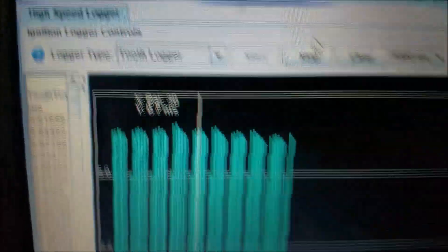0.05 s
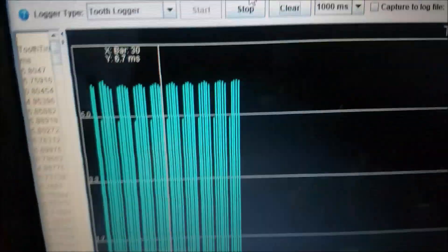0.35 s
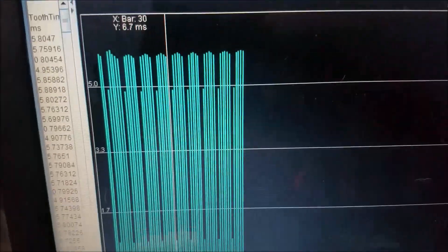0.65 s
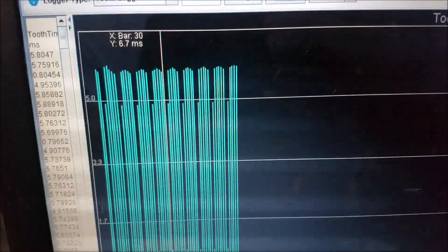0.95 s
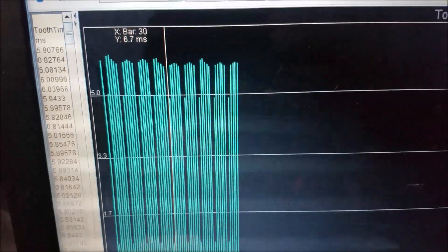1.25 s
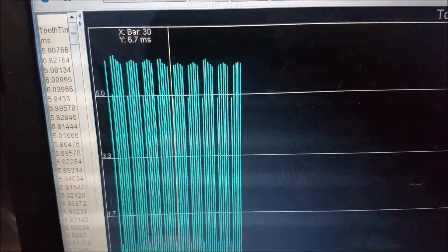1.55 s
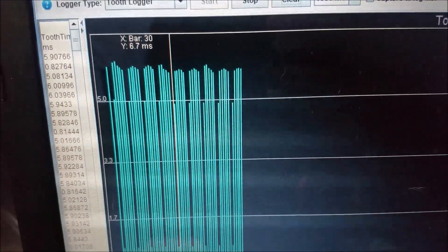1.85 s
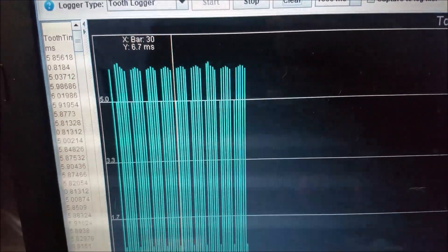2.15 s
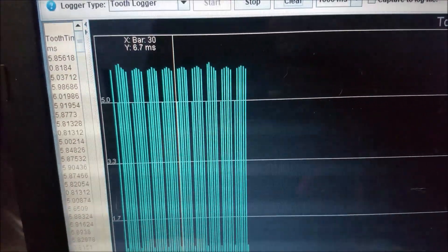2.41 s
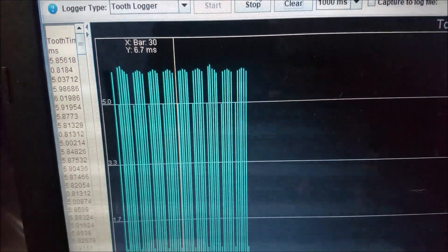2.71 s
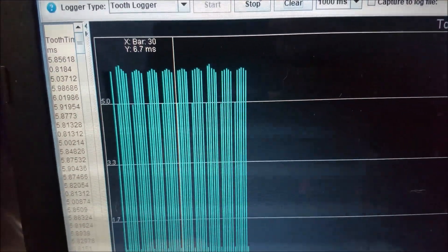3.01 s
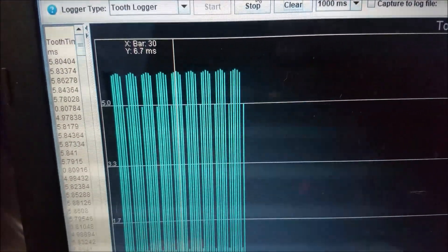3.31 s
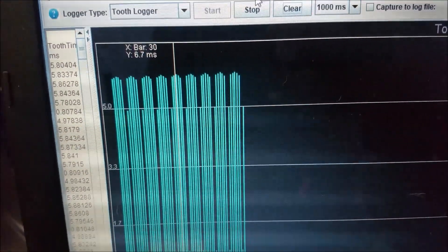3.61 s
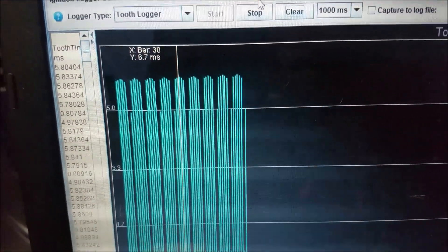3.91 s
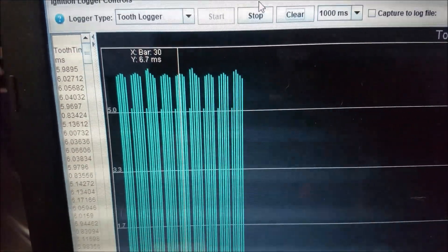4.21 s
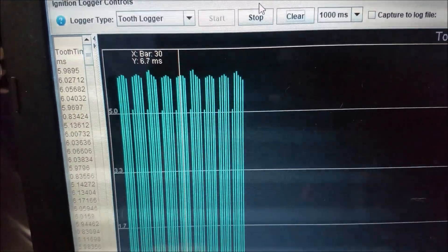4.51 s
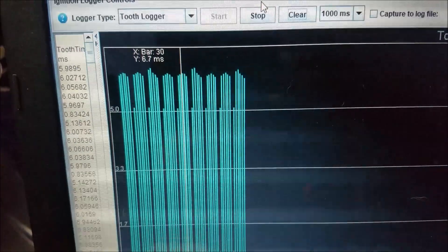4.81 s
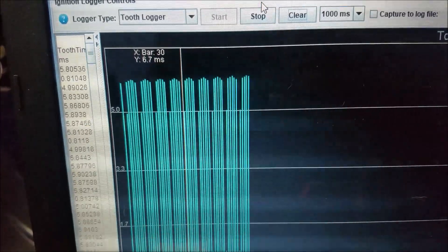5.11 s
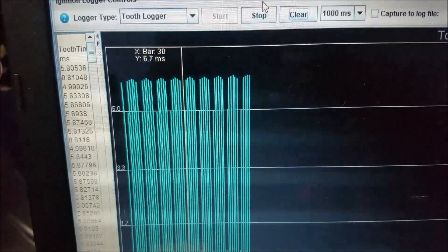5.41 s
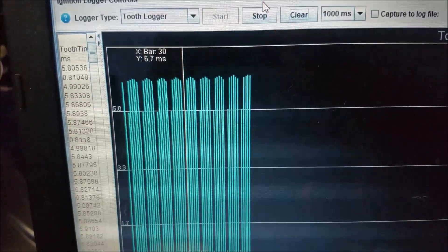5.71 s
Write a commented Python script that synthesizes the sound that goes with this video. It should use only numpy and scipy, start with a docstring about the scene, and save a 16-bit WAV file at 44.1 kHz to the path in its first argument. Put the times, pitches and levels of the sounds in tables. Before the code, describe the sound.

From the first moment a car engine is running at a fast idle, close by in a garage. It misfires, so the deep, booming exhaust has an uneven, chugging beat. Under it are a droning hum, lightly ringing body panels and a low room rumble. A quieter, throbbing hiss with rough ticking and metallic ringing comes mostly from the right. From about 0.1 seconds a faltering cylinder catches now and then with a dull thump, most often between 0.6 and 2.2 seconds and again from 2.9 to 3.8, with a last one near 5.2. Heavier, booming thumps land at about 0.5, 1.2, 3.0, 3.7 and 4.7 seconds. Each thump lifts the engine speed slightly before it sinks back, but the engine never revs. The sound cuts off abruptly at about 5.6 seconds.

```python
"""A V6 engine is already at a fast idle in a garage, two neighbouring cylinders misfiring. Six unequal
pulses a cycle boom through the exhaust and shake the body, over a droning block and a low room rumble.
Metal rings, and intake and belt hiss, roughened by the valve gear, comes mostly from the right.
Almost at once one bad cylinder starts to catch now and then; from half a second its neighbour joins, rarer
and heavier. Each catch thumps and kicks the speed up. Just before the end the sound cuts off."""
import sys
import numpy as np
from scipy import signal
from scipy.fft import rfft, irfft, next_fast_len
from scipy.io import wavfile
from scipy.ndimage import uniform_filter1d, minimum_filter1d

SR = 44100
rng = np.random.default_rng(int(sys.argv[2]) if len(sys.argv) > 2 else 0)


def wrap_up_sound(samples):
    """Save the sound to the file named by the first command line argument, as 16-bit audio."""
    columns = np.atleast_2d(samples).T
    # keep every value between -1 and 1, then stretch to whole-number steps
    tamed = np.clip(columns, -1, 1)
    steps = np.round(tamed * 32767).astype(np.int16)
    wavfile.write(sys.argv[1], SR, steps)


N = 253575
LEAD = SR // 2   # pre-roll, so the engine is already running
TIME = np.arange(-LEAD, N) / SR

# the first misfiring cylinder catches: start_s
HARD_CATCHES = [.088, .584, .869, 1.083, 1.297, 1.439, 1.651, 1.792, 2.219, 2.938, 3.156, 3.373, 3.445,
                3.803, 5.247]
# its neighbour catches: start_s, strength
HEAVY_CATCHES = [(.526, 0.7), (1.167, 0.63), (3.024, 0.57), (3.744, 0.67), (4.681, 0.68)]


def from_db(db):
    return 10 ** (np.asarray(db) / 20)


def unit_rms(x):
    return x / np.sqrt(np.mean(x ** 2) + 1e-20)


def pan(left_db):
    """Left and right gains, left_db apart; negative leans right."""
    return from_db(np.array([[left_db], [-left_db]]) / 2)


def colour(x, spectrum):
    """EQ by a curve through points of frequency_hz, gain_db."""
    size = next_fast_len(len(TIME))
    hz, db = np.transpose(spectrum)
    bins_hz = np.maximum(np.arange(size // 2 + 1) * SR / size, 1)
    gain = from_db(np.interp(np.log(bins_hz), np.log(hz), db))
    return irfft(rfft(x, size) * gain, size)[:len(TIME)]


def resonate(x, hz, width_hz):
    """One resonance with unity gain at its peak."""
    r = np.exp(-np.pi * width_hz / SR)
    feedback = [1, -2 * r * np.cos(2 * np.pi * hz / SR), r * r]
    return signal.lfilter(np.array([1, 0, -1]) * (1 - r * r) / 2, feedback, x + 1e-18)


def resonator_bank(x, modes):
    """Parallel resonances of alternating polarity, each with its own pan."""
    return sum((-1) ** k * from_db(db) * pan(left_db) * resonate(x, hz, width_hz)
               for k, (hz, width_hz, db, left_db) in enumerate(modes))


def swell(x, hz, width_hz):
    """Two resonances in series turn a softened click into a tone that swells and dies."""
    soft = signal.sosfilt(signal.butter(2, 420, fs=SR, output="sos"), x)
    tone = resonate(resonate(soft, hz, width_hz), hz, width_hz)
    return tone * np.e * SR / (2 * np.pi * width_hz)   # a unit click peaks near 1


def clicks(times, sizes):
    """Single-sample pulses at the given times."""
    at = np.round(np.asarray(times) * SR).astype(int) + LEAD
    inside = (at > 0) & (at < len(TIME) - 1)
    return np.bincount(at[inside], np.asarray(sizes)[inside], len(TIME))


def crank_rpm(rise_s=.03, ebb_s=1):
    """Each catch speeds the crank up at once, then it sinks back towards the idle."""
    # speed that the healthy cylinders hold by themselves: time_s, speed_rpm
    idle = [(0.0, 1710.22), (0.5, 1667.19), (1.35, 1629.65), (2.5, 1628.02), (3.1, 1602.2), (4.15, 1617.87),
            (4.65, 1604.5), (4.9, 1624.79), (5.6, 1619.95)]
    starts = HARD_CATCHES + [start for start, _ in HEAVY_CATCHES]
    ages = [np.maximum(TIME - start, 0) for start in starts]
    kicks = sum(np.exp(-age / ebb_s) - np.exp(-age / rise_s) for age in ages)
    return np.interp(TIME, *np.transpose(idle)) + 14.578 * kicks


def firings(cycle, spread_db, jitter_s):
    """One pulse per cylinder per cycle, never quite alike."""
    # the six unequal pulses: place_cycles, level_db
    cylinders = [(.036, -2.6), (.231, -.2), (.381, 1.2), (.559, 0), (.697, .9), (.895, .7)]
    place, db = np.transpose(cylinders)
    whole_cycles = np.arange(np.floor(cycle[0]), cycle[-1])[:, None]
    times = np.interp(whole_cycles + place, cycle, TIME, left=-2, right=2 * TIME[-1])
    late, loud = rng.standard_normal((2,) + times.shape)
    return clicks(times + jitter_s * late, from_db(db + spread_db * loud))


def exhaust(cycle):
    """The silencer passes only the lows of the pulses and cancels one narrow band."""
    # exhaust and garage resonances: pitch_hz, width_hz, gain_db, left_db
    modes = [(42.7, 15.3, -7.6, -2), (75.1, 15, -14.3, 0), (112, 22.5, -18.7, 0), (183.2, 22.2, -4.3, -3),
             (190, 18, -1.3, -3)]
    pulses = from_db(54.6) * firings(cycle, spread_db=.3, jitter_s=.00006)
    muffled = signal.sosfilt(signal.butter(6, 190, fs=SR, output="sos"), pulses)
    notched = muffled - resonate(muffled, hz=225, width_hz=9.2)
    return resonator_bank(notched, modes)


def block_drone(cycle, waver_db=3.0):
    """The block hums in clean tones, each wavering slowly in level, all chugging once a cycle."""
    # engine orders: multiple_of_cycle_rate, level_db
    orders = [(17, -46), (18, -44), (19, -49), (23, -51), (24, -48), (31, -53), (34, -50), (36, -52)]
    waver_times = np.arange(TIME[0], TIME[-1], 1 / 6)
    hum = 0
    for multiple, db in orders:
        waver = np.interp(TIME, waver_times, rng.standard_normal(len(waver_times)))
        tone = np.sqrt(2) * np.sin(2 * np.pi * (multiple * cycle + rng.random()))
        hum = hum + from_db(db + waver_db * waver) * tone
    chug = from_db(8.5 * np.cos(2 * np.pi * (cycle - .55)))
    return hum * chug * pan(-2.9)


def body_panels(cycle):
    """The firings knock on the body, loosely timed, and its panels ring."""
    # panel resonances: pitch_hz, width_hz, gain_db, left_db
    modes = [(260, 11, -57, -14), (330.6, 9.5, -40, -5), (415, 120, -47, 0), (523, 97, -44.5, -7)]
    pulses = from_db(52) * firings(cycle, spread_db=2.5, jitter_s=.0007)
    knocks = signal.sosfilt(signal.butter(2, [220, 620], "band", fs=SR, output="sos"), pulses)
    return resonator_bank(knocks, modes)


def valve_ticks(cycle, valves=12, spread_db=2.5, jitter_s=.0012, decay_s=.0025):
    """Valves close in turn round the cycle: an envelope of short, loosely timed spikes."""
    closings = np.arange(np.ceil(cycle[0] * valves), cycle[-1] * valves) / valves
    times = np.interp(closings, cycle, TIME)
    late, loud = rng.standard_normal((len(times), 2)).T
    hits = clicks(times + jitter_s * late, from_db(spread_db * loud))
    return unit_rms(signal.lfilter([1], [1, -np.exp(-1 / (decay_s * SR))], hits))


def engine_bay(cycle):
    """Hiss and ringing metal throb with the cycle and the crank, roughened by the valve gear."""
    # rush of intake, belts and fan on each side: frequency_hz, relative_db
    rush_left = [(400, -66), (700, -70), (950, -71), (1500, -73), (3000, -75.5), (4000, -79), (5200, -83.5),
                 (8000, -87.5), (9400, -87), (12000, -82), (14300, -81), (15700, -86)]
    rush_right = [(400, -74.5), (700, -72), (950, -68.5), (1500, -71), (2200, -66), (3000, -67),
                  (3800, -74), (6500, -73.5), (8000, -82.5), (9300, -89), (12000, -78.5), (14000, -81.5),
                  (15700, -84)]
    # ringing engine metal: pitch_hz, width_hz, relative_db, left_db
    metal_modes = [(871, 55, 13, -7), (1032, 38, 9.5, 5), (1157, 89, 3, -19), (1692, 15.5, -3, -40),
                   (1946, 32, -0.5, -35.5), (2212, 26, 6.5, -29), (2670, 29, 7.5, -11),
                   (3182, 12, 1, -31.5)]
    throb = from_db(.85 * np.cos(2 * np.pi * (cycle - .46)) + .7 * np.cos(4 * np.pi * (cycle - .02)))
    rattle = np.sqrt(1 + (from_db(-7) * valve_ticks(cycle)) ** 2)
    noise = rng.standard_normal((3, len(TIME))) * throb * rattle
    hiss = unit_rms(np.array([colour(noise[0], rush_left), colour(noise[1], rush_right)]))
    ringing = unit_rms(resonator_bank(noise[2], metal_modes))
    return from_db(-33) * hiss + from_db(-37.5) * ringing


def garage_rumble():
    """A bed of diffuse low noise, nearly the same on both sides."""
    # colour of the rumble: frequency_hz, relative_db
    spectrum = [(15, -48), (30, -88), (60, -56), (90, -30.5), (140, -42.5), (200, -29.5), (250, -55),
                (320, -46), (490, -58.5), (620, -75), (1000, -96), (2500, -105)]
    mid, side = (unit_rms(colour(rng.standard_normal(len(TIME)), spectrum)) for _ in range(2))
    stereo = mid + from_db(-10) * side * [[1], [-1]]
    return from_db(-27) * stereo * pan(-2)


def hard_catches(lurch_lead_s=.0175, puff_delay_s=.01513, recovery_s=.08):
    """A hard burn rocks the engine, then puffs out of the pipe; it is weaker just after a heavy one."""
    starts = np.array(HARD_CATCHES)
    since_heavy = starts[:, None] - np.array(HEAVY_CATCHES)[:, 0]
    recovering = ((since_heavy > 0) & (since_heavy < recovery_s)).any(axis=1)
    strength = from_db(-4 * recovering)
    lurch = from_db(-11) * swell(clicks(starts - lurch_lead_s, strength), hz=74.8, width_hz=21)
    puff = from_db(-9.5) * swell(clicks(starts + puff_delay_s, strength), hz=86.6, width_hz=69)
    return -(lurch + puff) * pan(0)


def heavy_catches(boom_delay_s=.0225):
    """A heavy burn upsets the gas flow: a thump, then the pipe booms."""
    starts, strength = np.transpose(HEAVY_CATCHES)
    thump = from_db(-5) * swell(clicks(starts, strength), hz=82.7, width_hz=28)
    boom = from_db(-10) * swell(clicks(starts + boom_delay_s, strength), hz=193, width_hz=41)
    return thump * pan(.5) - boom * pan(-6)


def scene():
    """The engine layers ride one cycle count, two crank turns to a cycle, over the garage rumble."""
    cycle = np.cumsum(crank_rpm()) / (2 * 60 * SR)
    cycle = cycle - cycle[LEAD] - .113   # open just before a cycle begins
    tailpipe = exhaust(cycle) + heavy_catches() + hard_catches()
    tailpipe[1] = np.interp(TIME - .0003, TIME, tailpipe[1])   # reaches the right side a little later
    mix = tailpipe + block_drone(cycle) + body_panels(cycle) + engine_bay(cycle) + garage_rumble()
    return mix[:, LEAD:]


def record(dry):
    """A limiter smoothly ducks the highest peaks, the sound stops dead, and the very top is cut."""
    ceiling, limiter_s, stop_s, cutoff_hz = .9, .008, 5.648, 15750
    window = int(limiter_s * SR)
    needed_gain = ceiling / np.maximum(np.abs(dry).max(axis=0), ceiling)
    gain = uniform_filter1d(minimum_filter1d(needed_gain, window), window)
    gate = TIME[LEAD:] < stop_s
    high_cut = signal.ellip(12, .1, 90, cutoff_hz, fs=SR, output="sos")
    return signal.sosfilt(high_cut, dry * gain * gate)


dry = scene()
out = record(dry)
wrap_up_sound(out)
```